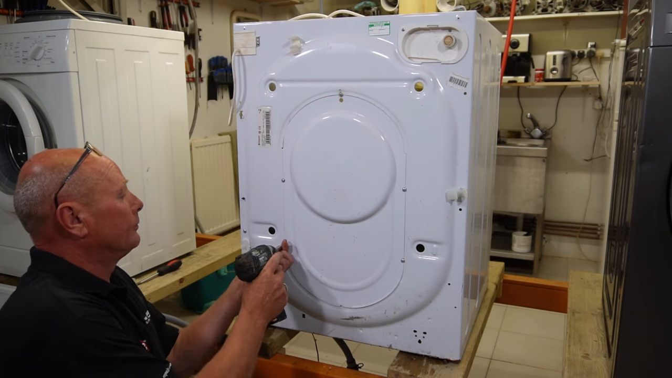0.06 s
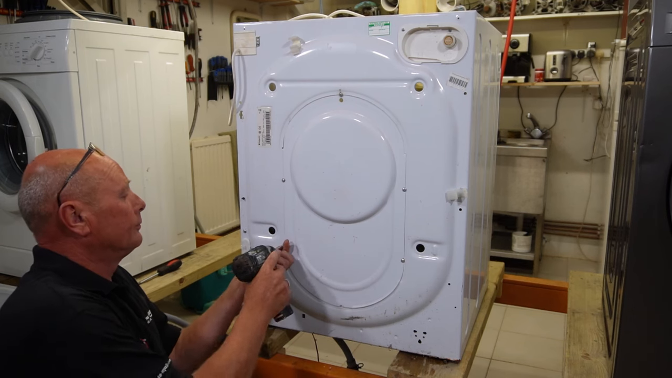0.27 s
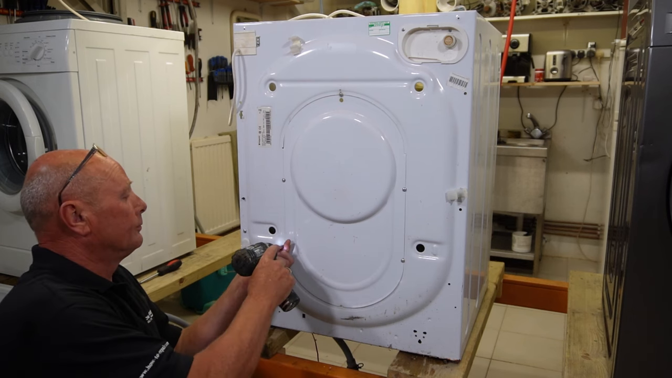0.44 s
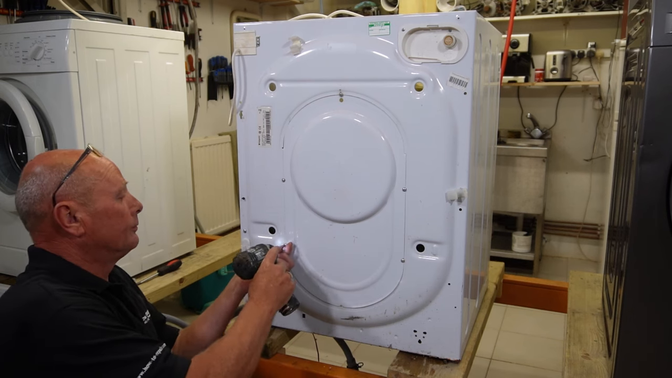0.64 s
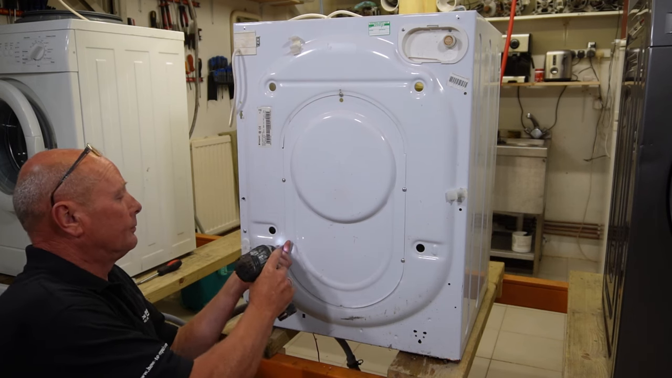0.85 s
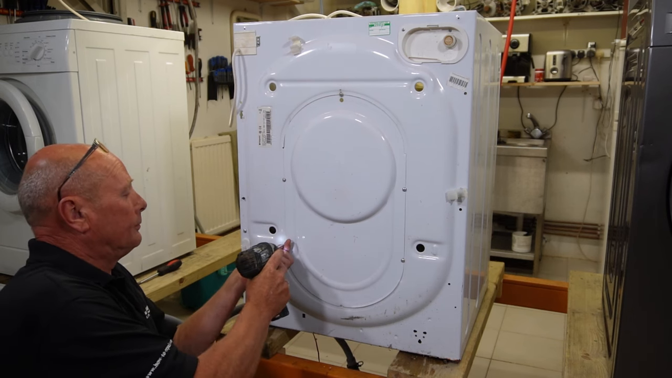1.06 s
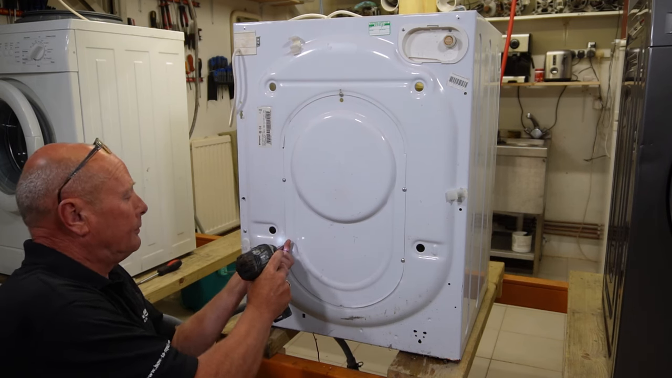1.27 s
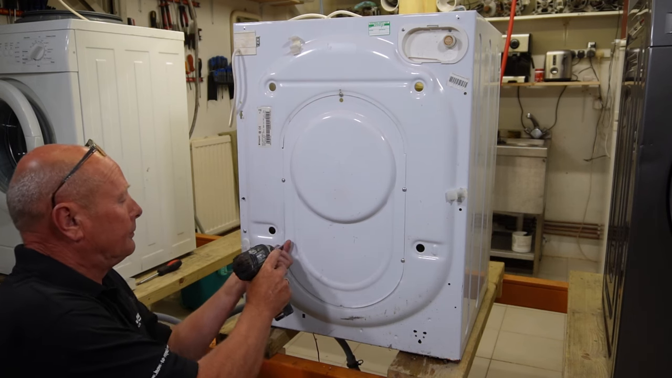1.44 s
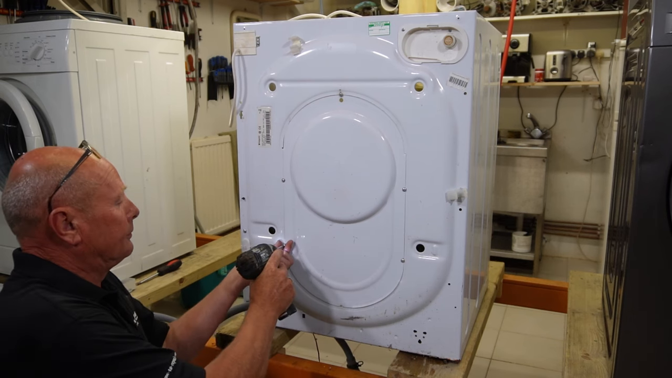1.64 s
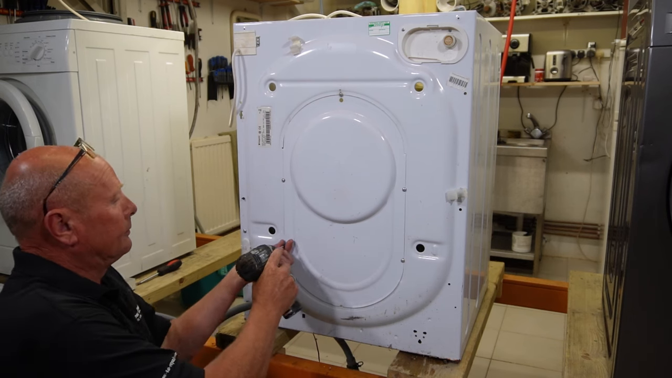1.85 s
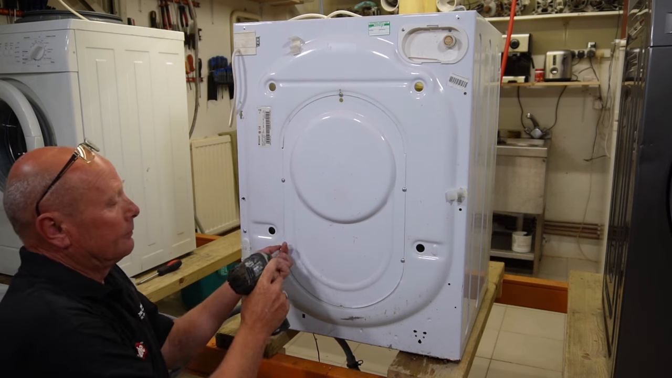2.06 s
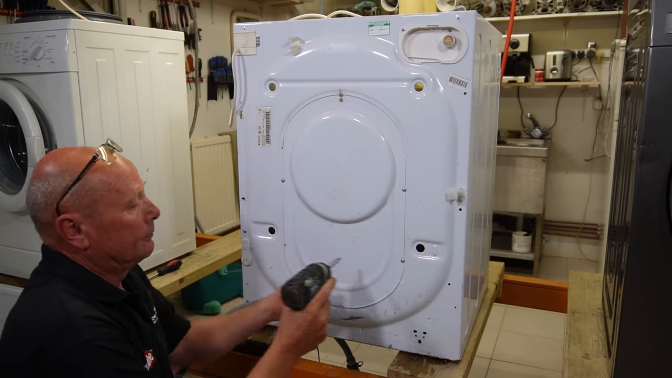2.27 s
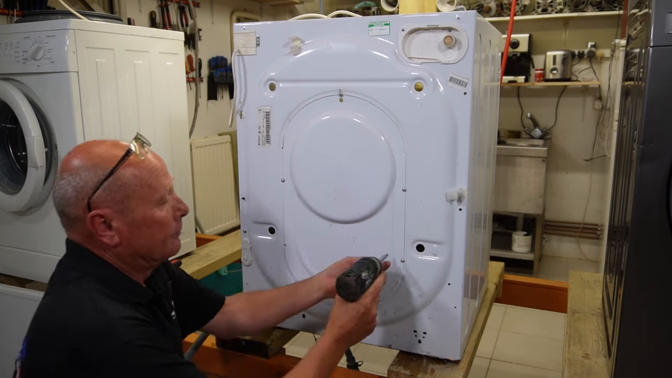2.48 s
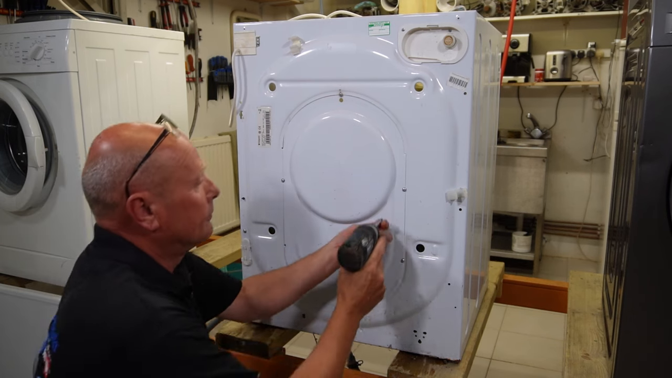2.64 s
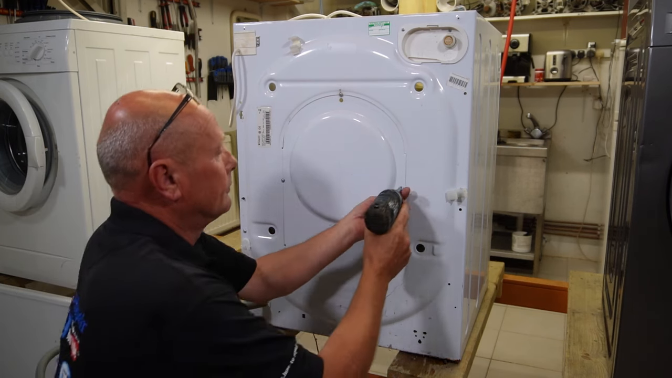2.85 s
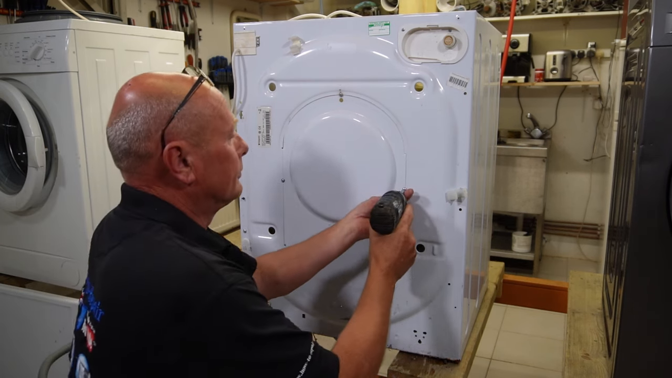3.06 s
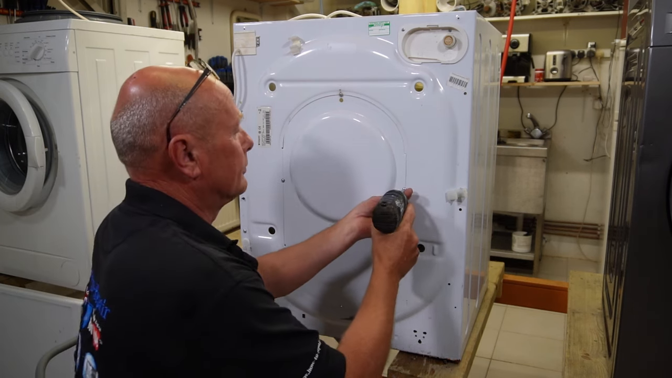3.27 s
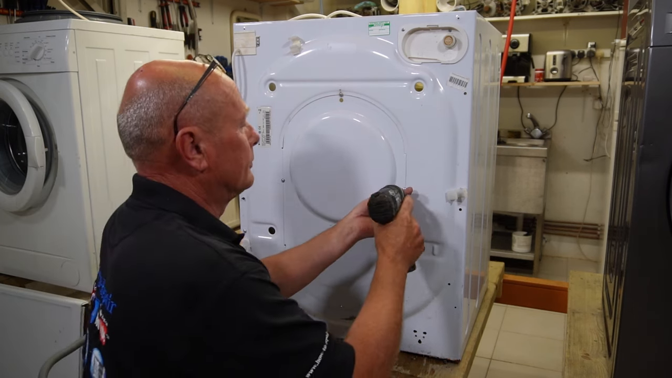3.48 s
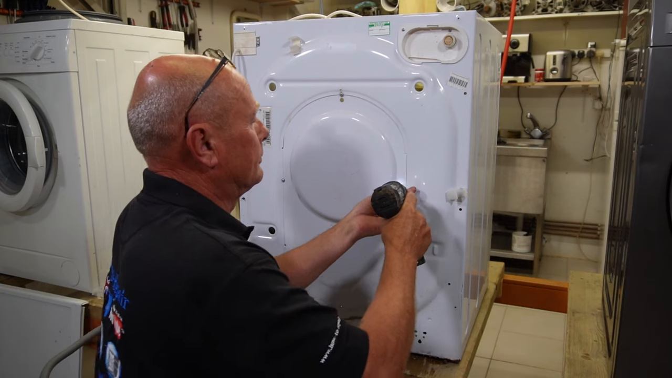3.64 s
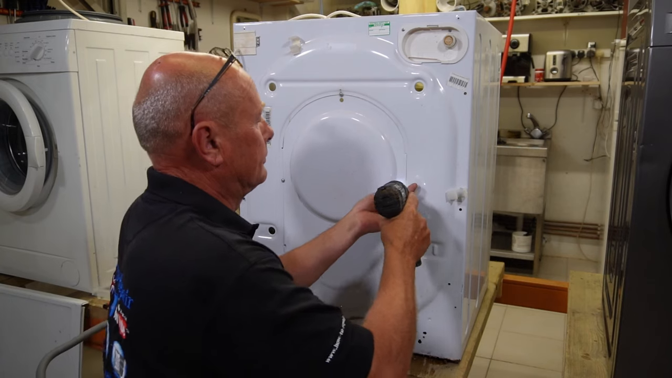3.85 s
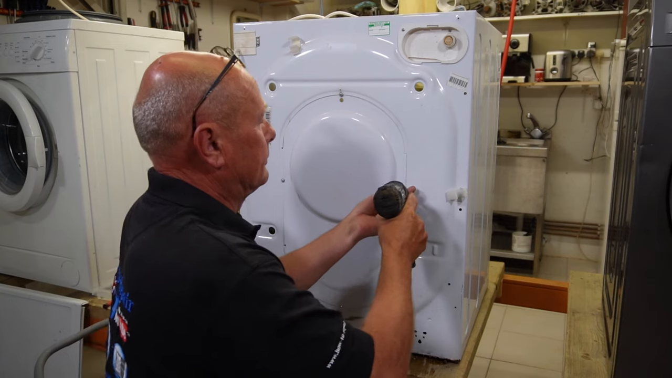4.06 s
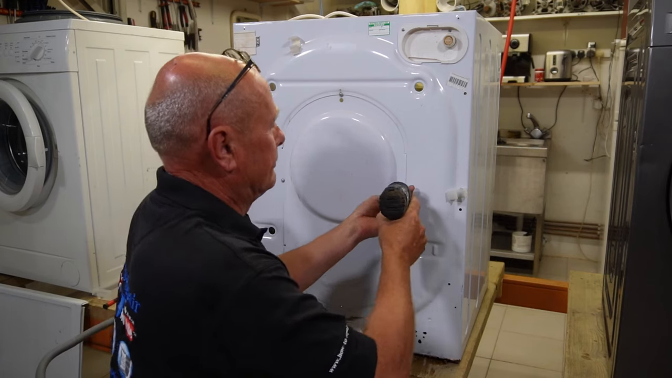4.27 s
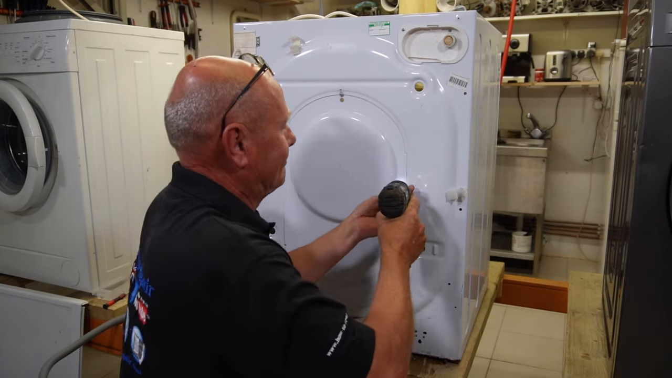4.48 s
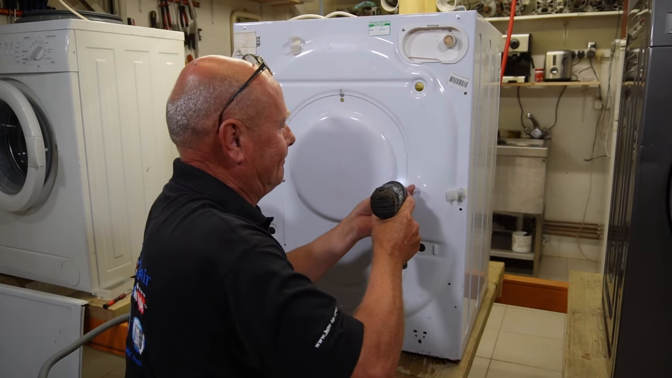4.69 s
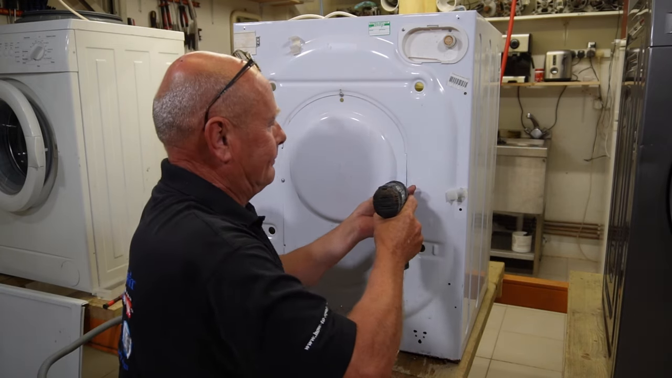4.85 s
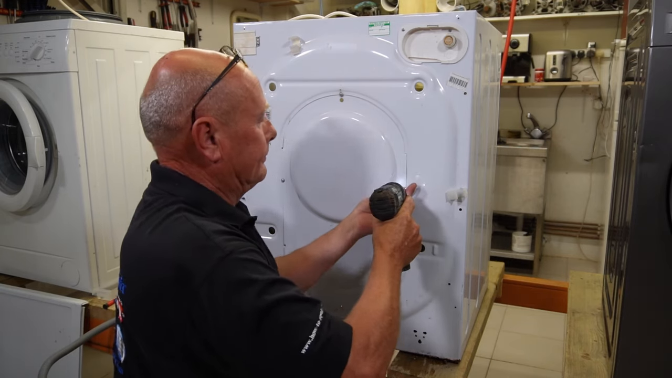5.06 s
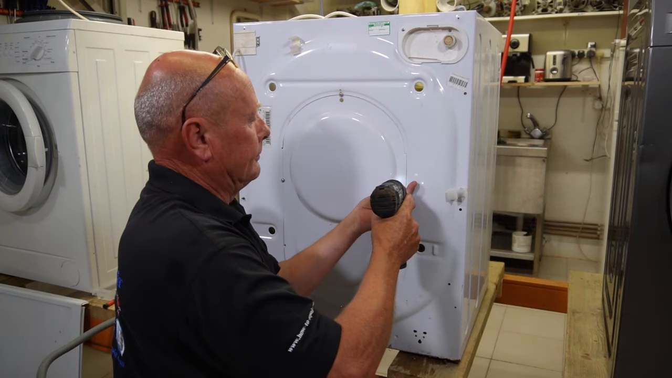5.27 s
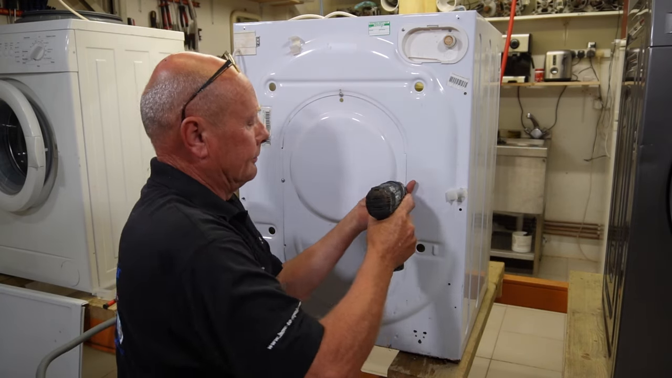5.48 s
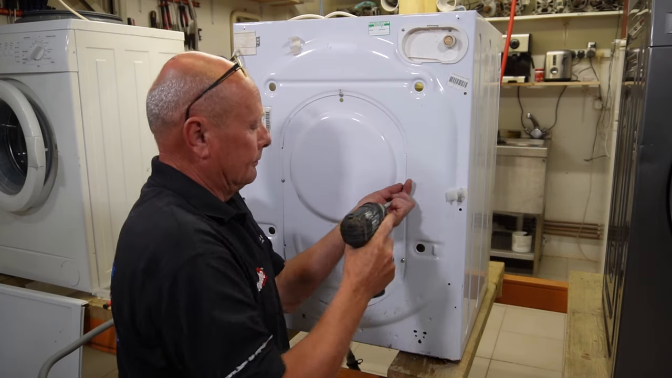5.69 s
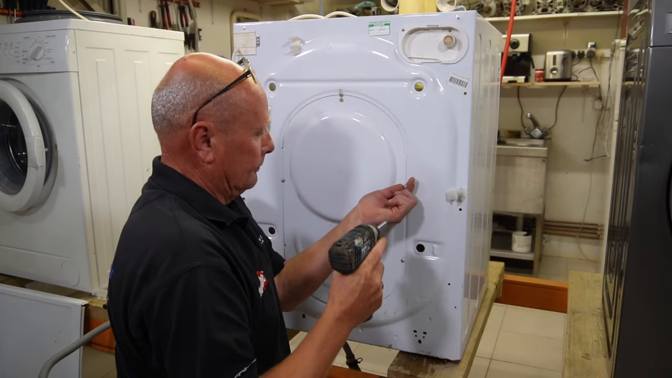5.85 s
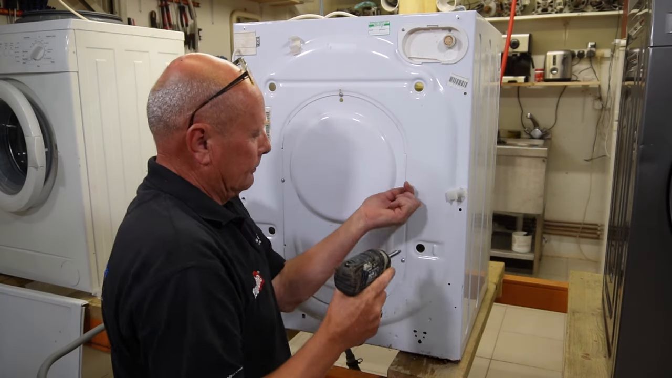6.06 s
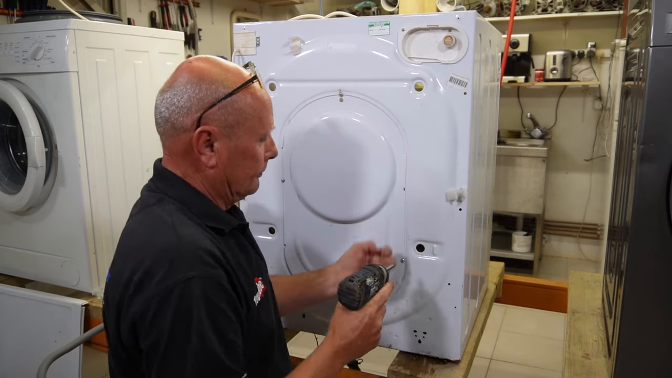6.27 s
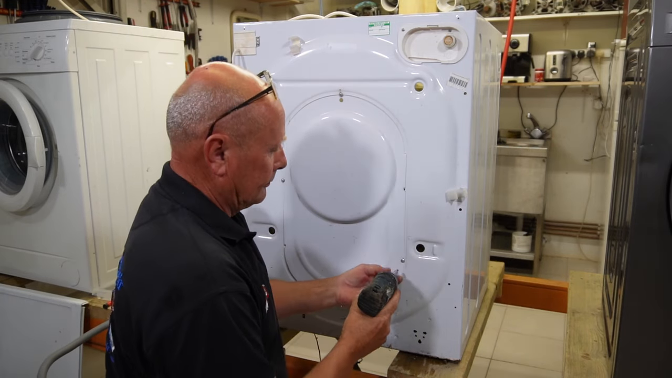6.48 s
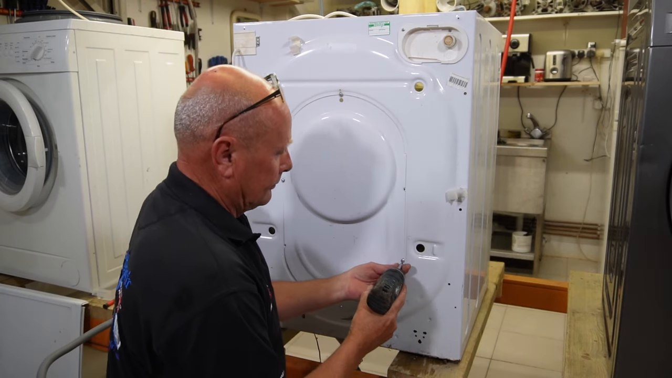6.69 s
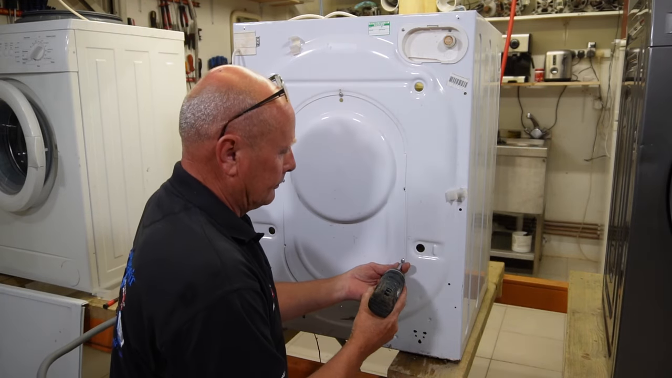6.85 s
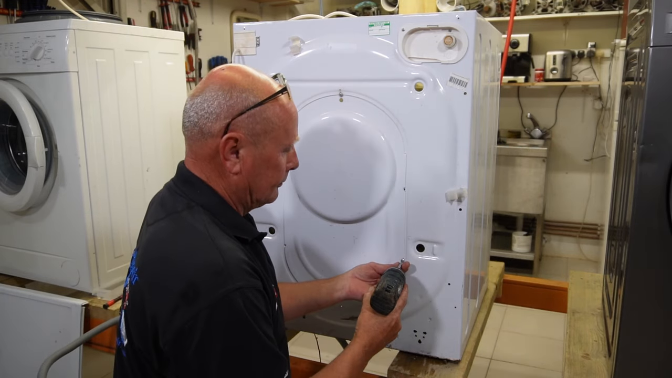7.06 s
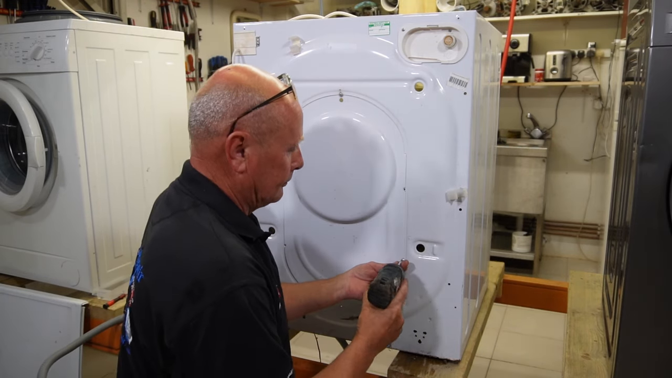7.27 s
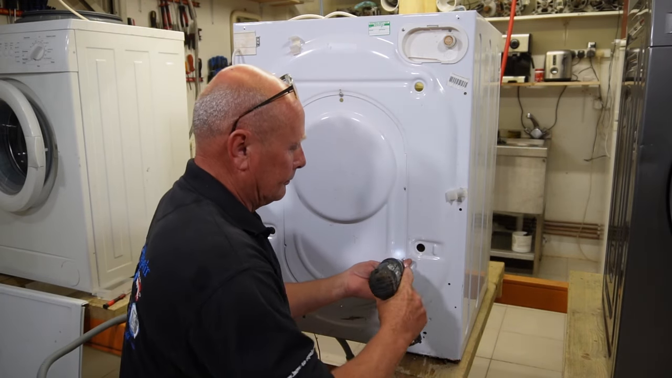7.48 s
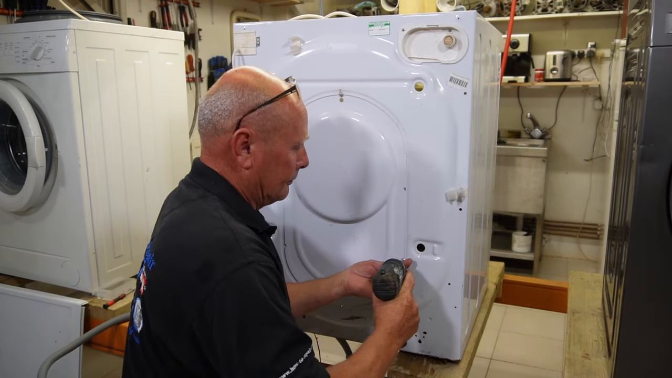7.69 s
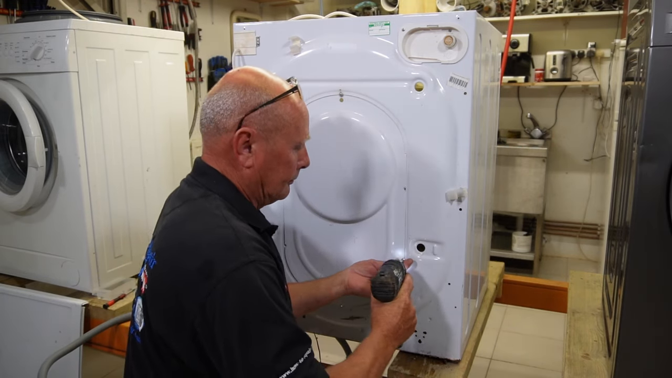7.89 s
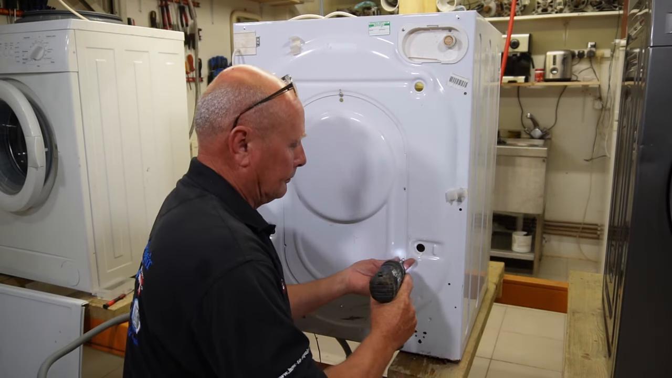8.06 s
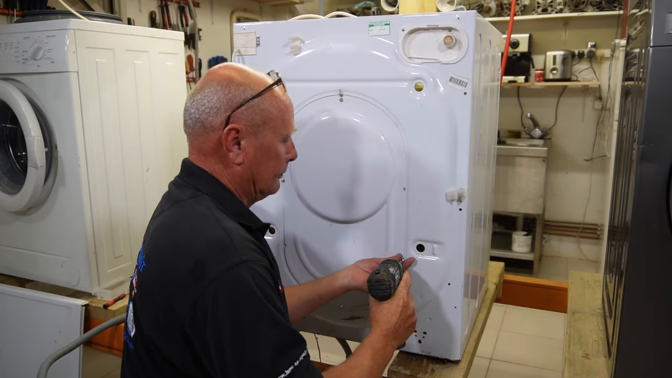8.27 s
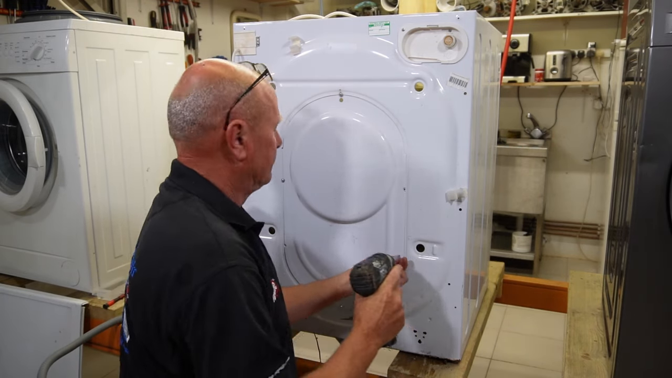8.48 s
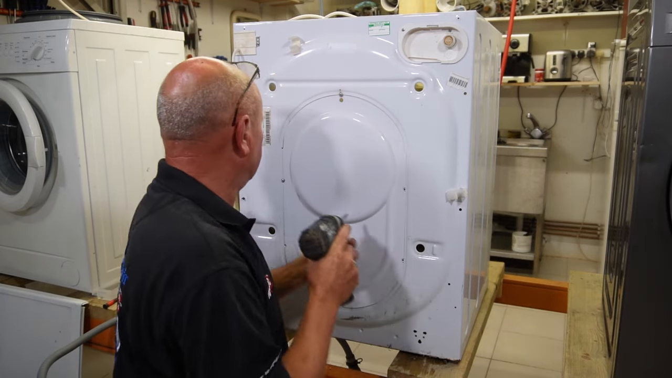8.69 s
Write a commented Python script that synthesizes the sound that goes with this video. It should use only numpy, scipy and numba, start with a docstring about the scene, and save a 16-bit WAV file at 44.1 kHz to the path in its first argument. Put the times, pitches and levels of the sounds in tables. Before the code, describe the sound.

A cordless drill backs screws out of a steel panel in short whining, rattling bursts, with metal knocks in an echoing workshop.

```python
"""In a small, echoing workshop, a cordless drill backs screws out of a washing machine's steel back panel.
In each run the gears whine and rattle, the screw thread scrapes, and the wobbling bit shakes the panel.
After a faint opening click, the bit knocks on screw heads and panel, and small ticks sound close by.
A thread squeaks once, something rubs softly, and the panel hums as it flexes. The drill is heard from
a few metres away, over quiet room noise, and a limiter holds down the loudest peaks."""
import sys
import numpy as np
from scipy import signal
from scipy.fft import rfft, irfft
from scipy.io import wavfile
from scipy.ndimage import uniform_filter1d, minimum_filter1d
from numba import njit

SR = 44100
rng = np.random.default_rng(int(sys.argv[2]) if len(sys.argv) > 2 else 0)


def generate_wav(signal):
    """Clip the signal to [-1, 1] and save it as 16-bit WAV at the path in sys.argv[1]."""
    frames = np.transpose(np.atleast_2d(signal))
    scaled = np.clip(frames, -1, 1) * 32767
    pcm = np.round(scaled).astype(np.int16)
    wavfile.write(sys.argv[1], SR, pcm)


N = 384993
TIME = np.arange(N) / SR

# the bright tone of steel scraping or tapping on steel: (frequency [Hz], level [dB])
STEEL_TONE = [(200, -78), (2000, -11), (4000, 8), (5300, 5.5), (7000, 0), (10000, -5), (12500, -7.5),
              (14500, -12.5), (16000, -29.5)]


def amp(db):
    """Turn decibels into a number to multiply by."""
    return 10 ** (np.asarray(db) / 20)


def unit_energy(x):
    """Scale a signal so that its squares add up to 1."""
    return x / np.sqrt(np.sum(x ** 2))


def along(points, hz):
    """Read a curve of (frequency [Hz], value) points, with octaves evenly spaced."""
    point_hz, value = np.transpose(points)
    return np.interp(np.log(hz + 1), np.log(point_hz), value)


def ring(x, response):
    """Let every sample of x set off a copy of the response."""
    return signal.fftconvolve(x, response)[:len(x)]


def colour(x, points, size=2048):
    """Give x a tone of (frequency [Hz], level [dB]) points; white noise keeps its power."""
    cepstrum = irfft(np.log(amp(along(points, np.fft.rfftfreq(size, 1 / SR)))))
    # folding the second half onto the first makes the filter ring after a hit, never before
    cepstrum[1:size // 2] *= 2
    cepstrum[size // 2 + 1:] = 0
    response = irfft(np.exp(rfft(cepstrum)))
    return ring(x, unit_energy(response))


def fade(t, t60):
    """Die away, dropping 60 dB in t60 seconds (the fade time)."""
    return np.exp(-np.log(1000) * t / t60)


def wander(t, rate):
    """Drift by about 1 either way, heading for a new random value `rate` times a second."""
    steps = rng.standard_normal(4096)
    return np.interp((t - t[0]) * rate, np.arange(len(steps)), steps)


def add(track, start, x):
    """Mix x into the track from `start` seconds on."""
    i = max(round(start * SR), 0)
    track[i:i + len(x)] += x[:N - i]


def room_noise(level_db=-50, waver_db=1):
    """A quiet, low rush whose level wavers slightly."""
    # the tone of the room's background: (frequency [Hz], level [dB])
    air_tone = [(15, -50), (25, -10), (97, -2.5), (236, -3), (285, -13), (560, -10.5), (659, -15),
                (734, -10.5), (1130, -18.5), (1890, -17.5), (4490, -28), (14400, -38), (16000, -52)]
    return amp(level_db + waver_db * wander(TIME, 23)) * colour(rng.standard_normal(N), air_tone)


def knocks(clack_t60=.078, tick_t60=.062, lag_s=.002):
    """After a faint click, each knock rings the panel, clacks the chuck (the bit's clamp) and ticks."""
    # first row: a faint click and fading echo at the very start; later rows: the bit knocks on steel
    # (time [s], relative panel level [dB], relative clack level [dB], relative tick level [dB],
    #   centre of the panel's ring [Hz])
    events = [(0.002, -31, -42.5, -62, 574), (0.198, -23, -26, -34.5, 515), (0.365, -44, -34, -42.5, 227),
              (0.449, -5, -1.5, -22, 336), (0.53, -7, -5.5, -6.5, 224), (1.083, -52, -33, -53, 546),
              (1.111, -27, -28, -30, 240), (1.195, -13, -13, -13, 360), (1.409, -10.5, -8, -16.5, 433),
              (1.487, -23, -16, -24.5, 409), (1.731, -21, -23.5, -36, 530), (1.96, -43, -35, -40, 407),
              (2.007, -26, -25.5, -31, 273), (2.774, -41.5, -42, -67, 573), (2.885, -38, -40.5, -66, 293),
              (2.917, -26, -48, -48.5, 506), (2.99, -27.5, -29.5, -57, 537),
              (3.038, -29.5, -28.5, -56, 427), (3.172, -30, -39, -61, 352), (3.308, -17.5, -28, -52, 347),
              (3.506, -17.5, -36, -68, 205), (3.654, -53, -33, -37, 476), (3.757, -17, -18.5, -45, 230),
              (3.793, -1, -4.5, -6, 212), (4.535, -35, -37.5, -40, 432), (4.621, -6.5, -12.5, -39, 243),
              (4.651, -3, -5, -7.5, 380), (5.208, -13, -0.5, -15.5, 345), (5.892, -28.5, -29.5, -39.5, 216),
              (5.923, -24.5, -31, -68, 332), (6.566, -40, -46, -64, 166), (6.688, -27, -27.5, -33.5, 510),
              (6.777, -33.5, -30.5, -44, 374), (6.796, -39, -32.5, -67, 614), (6.951, -30, -28, -48, 372),
              (7.033, -37.5, -35.5, -50, 366), (7.088, -37, -40, -54, 358), (7.192, -23.5, -26.5, -46, 380),
              (7.415, -10.5, -15, -19.5, 360), (7.459, -14, -22, -49, 370), (7.591, -17.5, -13, -14.5, 358),
              (7.644, -21.5, -15, -17, 510), (8.056, -12, -20, -42, 392), (8.453, -21, -24, -26, 352)]
    # the tone of the clack: (frequency [Hz], level [dB])
    clack_tone = [(50, -44), (300, -18), (700, 8), (1200, 8), (2400, 7.5), (3600, 3), (4500, -10.5),
                  (7000, -15), (15000, -48)]
    sheet, clack, tick = np.zeros((3, N))
    for start, panel_db, clack_db, tick_db, ring_hz in events:
        push = .24 * chatter(t60=.11)
        push[0] += 1  # a sharp spike ahead of the chatter
        add(sheet, start, panel(amp(panel_db + 33) * push, ring_hz, focus_db=6))
        echo = room_echo()
        # in a knock, the slightly loose chuck catches a moment later
        add(clack, start + lag_s, amp(clack_db + 30.5) * (amp(-4) * chatter(clack_t60) + echo))
        add(tick, start + lag_s, amp(tick_db + 26.5) * (amp(-1) * chatter(tick_t60) + echo))
    return workshop(sheet, direct_db=-1.5) + colour(clack, clack_tone) + colour(tick, STEEL_TONE)


def chatter(t60):
    """Many tiny contacts make a dying burst of noise."""
    return unit_energy(rng.standard_normal(SR) * fade(TIME[:SR], t60))


def panel(force, centre_hz, focus_db):
    """Struck steel rings and thuds, weakened by focus_db for each octave away from centre_hz."""
    # the panel's natural notes: (frequency [Hz], level [dB], fade time [s])
    notes = [(86, -14, 1.1), (112, -10, .55), (144, -7, .55), (165, -9, .5), (224, -4, .45), (246, -2, .4),
             (275, -6, .4), (293, -3, .35), (310, -2, .3), (332, 0, .4), (358, -2, .3), (378, -3, .3),
             (400, -4, .3), (432, -5, .35), (452, -6, .45), (502, -3, .35), (560, -9, .6), (595, -7, .45),
             (657, -8, .35), (712, -16, 1.3), (779, -11, .5), (1260, -12, .4), (1476, -13, .45),
             (1776, -13, .4), (2004, -13, .5), (2396, -14, .9)]
    # the thud of vibrations that die quickly: (frequency [Hz], level [dB])
    thud_tone = [(15, -48.5), (55, -39.5), (100, -2.5), (150, -7), (240, -2), (350, -5), (550, 0.5),
                 (800, -16), (1500, -15.5), (4000, -108.5)]
    t = TIME[:SR // 2]
    force = np.pad(force, (0, len(t)))
    spot_gains_db = rng.uniform(-3, 3, len(notes))  # each spot that is hit favours other notes
    ringing = 0
    for (hz, db, t60), spot_db in zip(notes, spot_gains_db):
        weight = amp(db + spot_db - focus_db * abs(np.log2(hz / centre_hz)))
        note = unit_energy(fade(t, t60) * np.sin(2 * np.pi * hz * t))
        ringing = ringing + rng.choice([-1, 1]) * weight * note
    response = unit_energy(radiate(ringing, corner_hz=67))
    thud = colour(force, [(hz, db - focus_db * abs(np.log2(hz / centre_hz))) for hz, db in thud_tone])
    return (ring(force, response) + thud) / np.sqrt(2)


def radiate(x, corner_hz=80):
    """Slow swaying of the panel makes little sound, so the deep bass is cut."""
    return signal.sosfilt(signal.butter(4, corner_hz, "high", fs=SR, output="sos"), x)


def room_echo(build_s=.00057):
    """The room's answer to a click: a wash of reflections that dies sooner in the treble."""
    # how long the workshop echoes: (frequency [Hz], fade time [s])
    bands = [(100, 0.61), (400, 0.62), (1200, 0.64), (3000, 0.39), (6000, 0.42), (13000, 0.32)]
    t = TIME[:SR]
    spectrum = rfft(rng.standard_normal(SR))
    frequencies = np.fft.rfftfreq(SR, 1 / SR)
    echo = 0
    for band_hz, t60 in bands:
        share = along([(hz, hz == band_hz) for hz, _ in bands], frequencies)
        echo = echo + irfft(spectrum * share, SR) * fade(t, t60) / np.sqrt(t60)
    return unit_energy(echo * (1 - np.exp(-t / build_s)))


def workshop(x, direct_db=-4, stretches=40):
    """Direct sound plus echo; the worker keeps moving, so each stretch blends into new reflections."""
    echoes = np.zeros(N)
    hop = N // stretches + 1
    blend = np.sin(np.pi * np.arange(2 * hop) / (2 * hop))
    for first in range(0, N, hop):
        stretch = x[first:first + 2 * hop]
        faded = np.pad(stretch * blend[:len(stretch)], (0, SR))
        add(echoes, first / SR, ring(faded, room_echo()))
    return (amp(direct_db) * x + echoes) / np.hypot(1, amp(direct_db))


def ticks(rise_s=.0016, t60=.016):
    """Tiny clicks, each a burst of noise that is strongest around one pitch."""
    # small ticks close to the listener: (time [s], relative level [dB], centre pitch [Hz])
    clicks = [(0.3613, -22, 3000), (1.025, -14, 2600), (2.1979, -39, 2020), (2.379, -28.5, 1170),
              (2.5572, -17.5, 1190), (3.5393, -7.5, 1000), (4.458, -13, 3020), (5.0209, -20, 3460),
              (5.67, -25.5, 2140), (6.0353, -20, 1300), (6.1438, -27, 1040), (6.17, -17, 3430),
              (6.1883, -27, 2060), (6.3755, -26.5, 2470), (6.463, -28, 1266), (6.5494, -13, 1310),
              (6.6207, -14, 1300)]
    out, t = np.zeros(N), TIME[:SR // 20]
    for start, db, hz in clicks:
        burst = rng.standard_normal(len(t)) * fade(t, t60) * (1 - np.exp(-t / rise_s))
        tone = [(hz / 8, -20), (hz, 0), (hz * 2, -5), (hz * 4, -22), (hz * 10, -36)]
        add(out, start, amp(db - 6) * colour(burst, tone))
    return out


def drill(carrier_ratio=.42, seat_s=.016, edge_s=.0092, run_out_s=.33, uneven_db=1.5, loose_db=-7):
    """The motor turns gears, bit and screw. Returns the whine and the racket (rattle, scrape, panel)."""
    # pulls of the trigger: (start [s], bit bites [s], trigger let go [s], motor speed at the bite [Hz],
    #   top speed [Hz], free whine [dB], loaded whine [dB], gear rattle [dB], thread scrape [dB],
    #   panel rattle [dB], wobble [dB], extra racket at the start [dB], centre of the panel's ring [Hz])
    pulls = [(0.444, 0.524, .82, 224.7, 307.7, -25, -25, -7, -18.5, -9.5, -30, -1, 290),
             (1.126, 1.192, 1.485, 199.9, 328.8, -21, -18.5, -11.5, -24.5, -17.5, -47, -8, 390),
             (1.624, 1.697, 1.732, 230.2, 240.3, -21, -36.5, -23, -35.5, -35, -33.5, -18, 444),
             (3.72, 3.784, 4.13, 215.4, 302.5, -22, -30, -8, -15.5, -4.5, -24, -30, 230),
             (4.57, 4.652, 4.845, 200.2, 318, -22, -22.5, -9, -22.5, -16, -54, -12.5, 340),
             (5.12, 5.207, 5.39, 222.1, 284.8, -20.5, -27, -12, -26.5, -13, -34, -14, 297),
             (7.588, 7.645, 7.708, 159.9, 234.6, -21, -15.5, -17.5, -23, -18.5, -45, 18, 447),
             (7.882, 8.051, 8.2, 317.5, 319, -11.5, -36, -11, -22.5, -12, -59, -1, 460)]
    # the tone of rattling gears: (frequency [Hz], level [dB])
    gear_tone = [(60, -88), (300, -17.5), (700, -0.5), (1000, -0.5), (1500, 2), (2300, 2.5), (3000, 2),
                 (3750, -1), (4400, -29), (6000, -22), (15000, -34.5)]
    # level slopes: (rise with speed [dB/octave], drop as the screw loosens [dB/s], drop once let go [dB/s])
    whine_slopes, gear_slopes, scrape_slopes = (5.8, 4.7, 280), (1.67, 35.3, 360), (2.3, 36, 570)
    panel_slopes, wobble_slopes = (3.3, 18, 160), (7, -5.5, 187)  # the wobble grows as the screw loosens
    whine, rattle, scrape, sheet, sway = np.zeros((5, N))
    for (start, bite, release, bite_hz, top_hz, free_db, loaded_db,
         gear_db, scrape_db, panel_db, wobble_db, start_db, ring_hz) in pulls:
        stop = release + run_out_s
        t = np.arange(start, stop, 1 / SR)
        hz = motor_speed(t, start, bite, release, bite_hz, top_hz)
        grip = np.clip((t - bite) / seat_s, 0, 1)  # 1 once the bit sits in the screw head
        edges = np.clip(np.minimum(t - start, stop - t) / edge_s, 0, 1)
        slack_db = loose_db * (1 - grip)
        load_db = np.interp(t, [start, bite], [start_db, 0]) + slack_db + uneven_db * wander(t, 28.6)

        def level(slopes, db):
            """The strength of one layer through this pull."""
            return edges * amp(db + effort_db(slopes, t, hz, bite, release, bite_hz))

        turns = np.cumsum(hz * (1 + .008 * wander(t, 90))) / SR  # the changing load makes the speed waver
        carrier = turns * carrier_ratio  # turns of the slower frame that carries the gears
        whine_db = free_db + grip * (loaded_db - free_db)
        add(whine, start, level(whine_slopes, whine_db) * gear_whine(t, hz, turns, grip))
        tooth_hits = impacts(turns, sharpness=1.67, scatter_db=4.5)
        add(rattle, start, level(gear_slopes, gear_db + load_db) * tooth_hits)
        thread_rubs = impacts(carrier, sharpness=1, scatter_db=7)
        add(scrape, start, level(scrape_slopes, scrape_db + load_db) * thread_rubs)
        # the carrier jolts the bit once a turn; a loose bit passes less of that to the panel
        jolts = impacts(carrier, sharpness=5.3, scatter_db=3)
        force = level(panel_slopes, panel_db + load_db + slack_db) * jolts
        add(sheet, start, panel(force, ring_hz, focus_db=2.5))
        add(sway, start, level(wobble_slopes, wobble_db + load_db) * wobble(carrier))
    return whine, colour(rattle, gear_tone) + colour(scrape, STEEL_TONE) + sheet + radiate(sway)


def motor_speed(t, start, bite, release, bite_hz, top_hz, kick_hz=62.1, peak_share=.77, coast_s=.16):
    """Turns a second: a quick spin-up, an arch to top speed as the screw loosens, then coasting down."""
    spin_up = np.interp(t, [start, bite], [kick_hz, bite_hz])
    progress = np.clip((t - bite) / (release - bite), 0, 1)
    loosening = (top_hz - bite_hz) * np.sin(np.pi / 2 * progress / peak_share) ** 2
    return (spin_up + loosening) * np.exp(-np.maximum(t - release, 0) / coast_s)


def effort_db(slopes, t, hz, bite, release, bite_hz):
    """A layer grows with the spin-up, shifts as the screw loosens and falls once the trigger is let go."""
    per_octave, ease, fall = slopes
    octaves = np.where(t < bite, np.log2(hz / bite_hz), 0)
    loosening_s = np.clip(t - bite, 0, release - bite)
    coasting_s = np.maximum(t - release, 0)
    return per_octave * octaves - ease * loosening_s - fall * coasting_s


def gear_whine(t, hz, turns, grip, flutter_db=3):
    """Meeting teeth make tones; gaps between them let each tone flutter and drift, drifting more under load."""
    # tones of the gear teeth: (multiple of the motor speed, level [dB])
    tones = [(6, -3), (9, -7), (12, -1), (15, -9), (18, -7), (21, -15), (24, -13), (27, -19), (30, -19),
             (36, -22), (42, -26)]
    # how well the gearbox shell gives off each pitch: (frequency [Hz], level [dB])
    shell = [(600, -13.5), (1500, -4), (2300, 2.5), (3100, 2.5), (3900, 0.5), (4500, -8), (6000, -6),
             (9000, 1.5), (14000, -18)]
    whine = 0
    for multiple, db in tones:
        slip = np.cumsum(hz * (.008 + .012 * grip) * wander(t, 700)) / SR
        strength = amp(db + flutter_db * wander(t, 180) + along(shell, multiple * hz))
        whine = whine + strength * np.sin(2 * np.pi * multiple * (turns + slip))
    return whine


def impacts(turns, sharpness, scatter_db):
    """Parts hit or rub once a turn, each time making a noise burst of random strength."""
    strength = amp(scatter_db * rng.standard_normal(4096))[turns.astype(int) % 4096]
    bursts = strength * np.exp(-sharpness * (turns % 1)) * rng.standard_normal(SR)[:len(turns)]
    return bursts / np.sqrt(np.mean(bursts ** 2))


def wobble(carrier):
    """The off-centre bit rocks the panel, making a low drone."""
    # tones of the rocking: (multiple of the carrier speed, level [dB])
    tones = [(1, -15), (2, 1.5), (3, 5.5), (4, -21.5), (5, -20)]
    return sum(amp(db) * np.sin(2 * np.pi * multiple * carrier) for multiple, db in tones)


def squeak(waver=.016):
    """The screw thread sticks and slips in a thin, wavering whistle."""
    # the thread's whistle: (time [s], length [s], pitch [Hz], level [dB])
    whistles = [(1.215, .07, 12050, -26)]
    out = np.zeros(N)
    for start, length, hz, db in whistles:
        t = TIME[:int(length * SR)]
        cycles = np.cumsum(hz * (1 + waver * wander(t, 600))) / SR
        add(out, start, amp(db) * np.sin(np.pi * t / length) * np.sin(2 * np.pi * cycles))
    return out


def rub(start_s=3.38, peak_s=3.45, end_s=3.66, level_db=-49.5):
    """Light rubbing on the painted panel as the bit is lined up: a hiss that swells and fades."""
    swell = np.interp(TIME, [start_s, peak_s, end_s], [0, 1, 0])
    hiss = colour(rng.standard_normal(N), [(1000, -16), (4500, 4), (9000, -2), (15000, -11)])
    return amp(level_db) * swell * hiss


def flex_hum(hz=89.3, rise_s=.03, t60=1.3):
    """The whole panel flexes as the pressure on it changes, and hums at its lowest note."""
    # flexes of the panel: (time [s], level [dB])
    flexes = [(3.99, -19), (4.48, -31), (5.329, -35.5)]
    out, t = np.zeros(N), TIME[:2 * SR]
    hum = (1 - np.exp(-t / rise_s)) * fade(t, t60) * np.sin(2 * np.pi * hz * t)
    for start, db in flexes:
        add(out, start, amp(db) * hum)
    return out


def scene(tick_room_db=-10):
    """Mix all the sounds; the nearby ticks get only a little echo."""
    whine, racket = drill()
    near_ticks = ticks()
    room = workshop(racket + .75 * whine + squeak() + amp(tick_room_db) * near_ticks)
    beam = .4 * whine  # the gearbox aims its whine straight at the listener
    return (room + beam + knocks() + near_ticks + flex_hum() + rub() + room_noise())[None]


@njit
def follow_peaks(x, decay):
    """Track the level: jump up to each peak at once, then sink back."""
    out, held = np.empty(len(x)), 0.
    for i in range(len(x)):
        held = max(abs(x[i]), held * decay)
        out[i] = held
    return out


def record(dry, ceiling_db=-1, release_s=.073, top_hz=16000):
    """A limiter turns the sound down at loud peaks, then the highest treble is cut."""
    peaks = follow_peaks(dry[0] + 1e-9, np.exp(-1 / (release_s * SR)))
    gain = np.minimum(1, amp(ceiling_db) / peaks)
    smooth_gain = uniform_filter1d(minimum_filter1d(gain, size=65), size=65)
    treble_cut = signal.ellip(10, .2, 80, top_hz, fs=SR, output="sos")
    return signal.sosfilt(treble_cut, dry * smooth_gain)


dry = scene()
out = record(dry)
generate_wav(out)
```